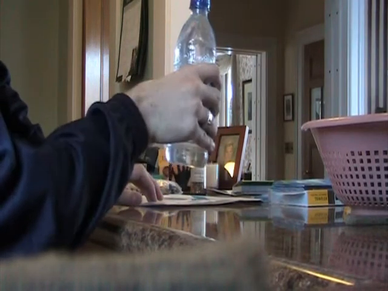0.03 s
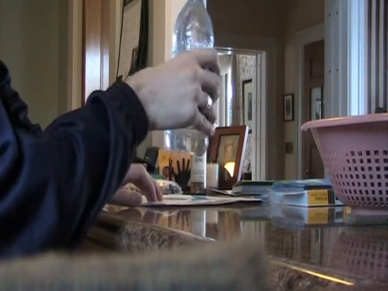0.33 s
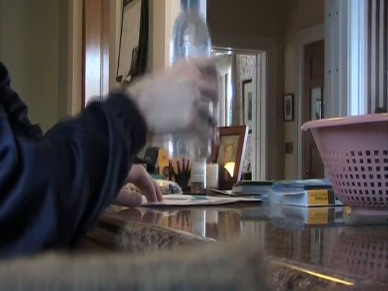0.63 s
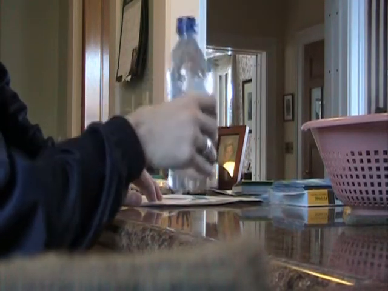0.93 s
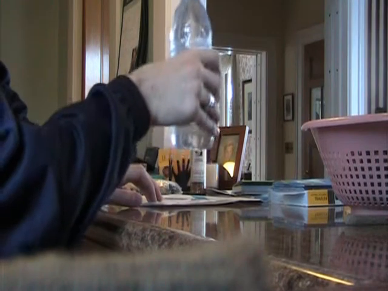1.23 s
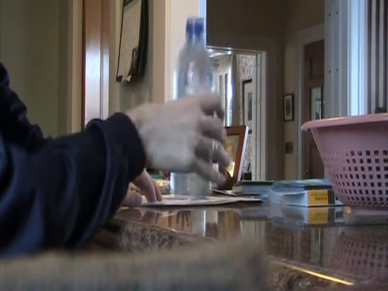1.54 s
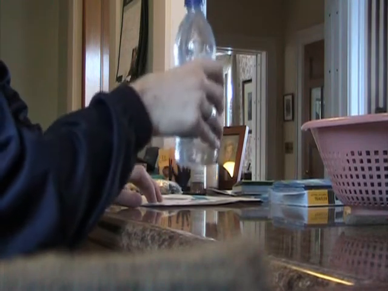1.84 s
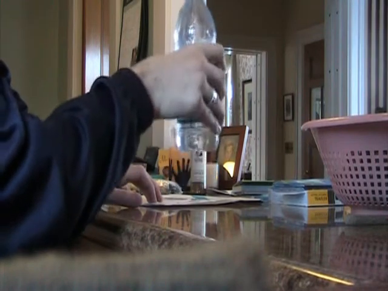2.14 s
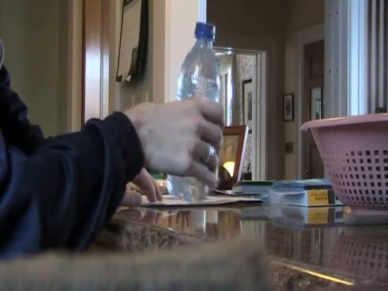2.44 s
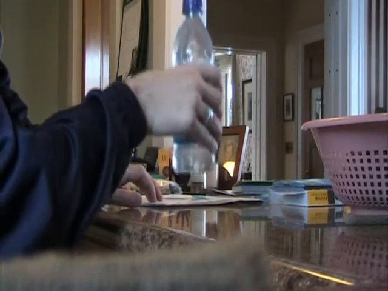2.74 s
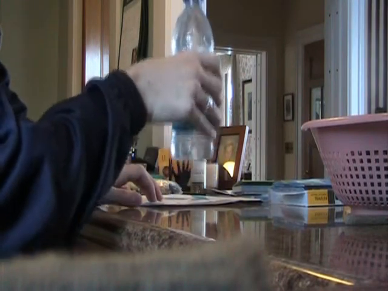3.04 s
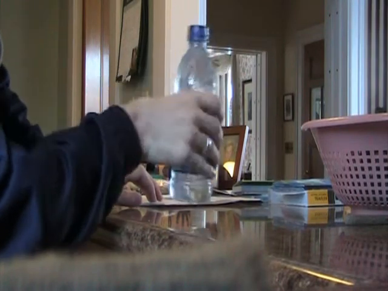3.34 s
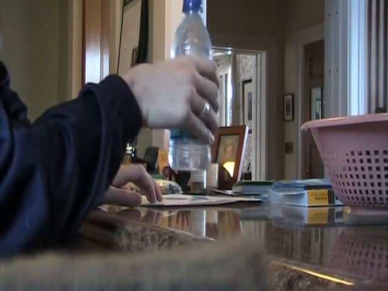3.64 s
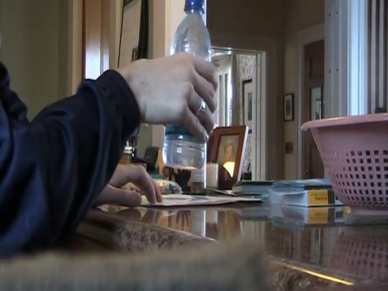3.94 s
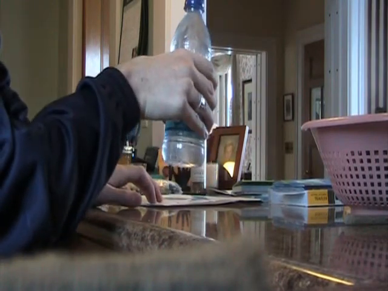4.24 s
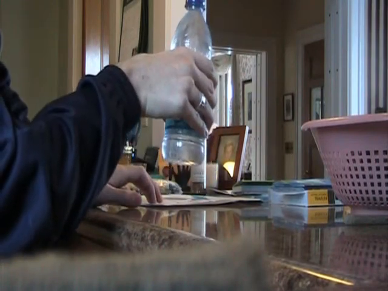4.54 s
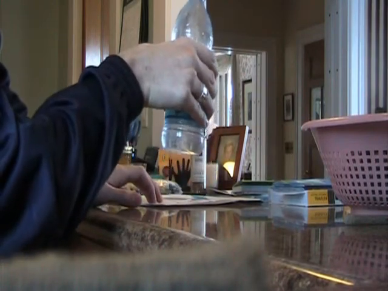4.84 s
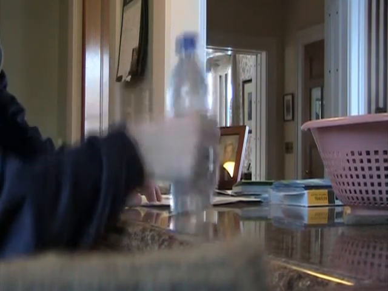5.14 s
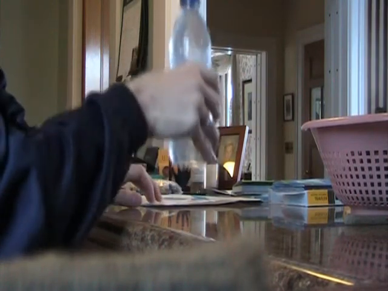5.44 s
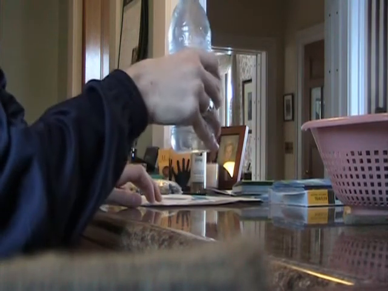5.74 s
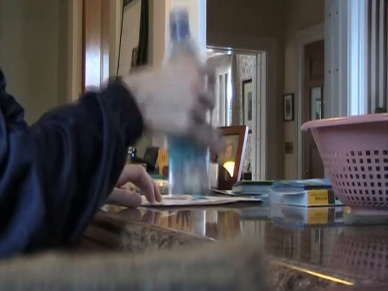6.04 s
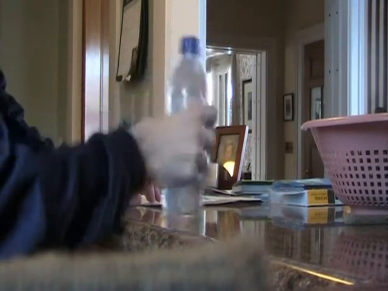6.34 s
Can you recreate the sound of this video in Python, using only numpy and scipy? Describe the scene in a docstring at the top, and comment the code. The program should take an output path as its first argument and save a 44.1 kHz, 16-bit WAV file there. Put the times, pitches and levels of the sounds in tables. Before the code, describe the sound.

A plastic water bottle is pounded on a stone kitchen counter in sharp, crackling thuds over a faint fridge hum.

```python
"""A plastic water bottle is pounded, bottom down, on a stone kitchen counter close to the microphone.
Each blow is a short crackle of the ribbed base and a thud that rings counter and bottle and, when hard,
overloads the input. The last lands on the rim; the base slaps down and something small tinkles.
The kitchen answers with a half-second tail. A fridge hums behind; the bottle creaks in the grip."""
import sys
import numpy as np
from scipy import signal
from scipy.fft import rfft, irfft
from scipy.io import wavfile

SR = 44100
rng = np.random.default_rng(int(sys.argv[2]) if len(sys.argv) > 2 else 0)


def inscribe(sig):
    """Save sig as 16-bit PCM at rate SR to the path in sys.argv[1].

    A 1-D sig is mono; a 2-D sig holds one channel per row.
    Samples are clipped to [-1, 1] before scaling.
    """
    pcm = np.round(np.clip(np.atleast_2d(sig).T, -1, 1) * 32767)
    wavfile.write(sys.argv[1], SR, pcm.astype(np.int16))


N = 285768
LEAD_IN = SR // 4   # samples before time zero


def from_db(db):
    """Decibels to gain."""
    return 10 ** (np.asarray(db) / 20)


def at_hz(points, hz):
    """Reads a table on a log-frequency axis."""
    f, value = np.transpose(points)
    return np.interp(np.log(np.maximum(hz, 1)), np.log(f), value)


def low_pass(x, hz, order=2):
    """Causal Butterworth low-pass."""
    return signal.sosfilt(signal.butter(order, min(hz, .45 * SR), fs=SR, output="sos"), x)


def resonance(x, hz, width_hz):
    """Two-pole resonance, unity peak gain."""
    r = np.exp(-np.pi * width_hz / SR)
    feedback = [1, -2 * r * np.cos(2 * np.pi * hz / SR), r * r]
    return signal.lfilter(np.array([1, 0, -1]) * (1 - r * r) / 2, feedback, x)


def add(track, sound, time_s):
    """Mixes a sound into a track that starts one lead-in before time zero."""
    start = LEAD_IN + round(time_s * SR)
    part = sound[..., :track.shape[-1] - start]
    track[:, start:start + part.shape[-1]] += part


def stereo_noise(spectrum, correlation, size):
    """Noise with a given spectrum and left-right correlation; 0 dB is white noise of rms 1."""
    hz = np.fft.rfftfreq(size, 1 / SR)
    mid, side = rfft(rng.standard_normal((2, size))) * from_db(at_hz(spectrum, hz))
    alike = np.clip(at_hz(correlation, hz), -1, 1)
    return irfft(np.sqrt((1 + alike) / 2) * mid + np.sqrt((1 - alike) / 2) * side * [[1], [-1]], size)


def dying_noise(spectrum, t60s, correlation, size):
    """Response of countless modes: half-octave bands, each with its own gain and decay."""
    t, hz = np.arange(size) / SR, np.fft.rfftfreq(size, 1 / SR)
    white = rfft(stereo_noise([(1, 0), (SR, 0)], correlation, size))
    out = 0
    for centre_hz in 45 * 2 ** np.arange(0, 9, .5):
        octaves = np.log2(np.maximum(hz, 1) / centre_hz)
        window = np.cos(np.pi / 2 * np.clip(2 * octaves, -1, 1)) ** 2
        band = irfft(white * window, size) * from_db(-60 * t / at_hz(t60s, centre_hz))
        norm = np.sqrt(2 * window.mean() / np.sum(band ** 2))
        out = out + band * norm * from_db(at_hz(spectrum, centre_hz))
    return out


# clatter spectrum: (frequency [Hz], relative density [dB])
CLATTER_SPECTRUM = [(60, -31), (150, -25.5), (300, 5), (600, 3), (1200, -4.5), (2400, -8.5), (4500, -24),
                    (8000, -25), (15000, -36)]
# clatter decay: (frequency [Hz], t60 [s])
CLATTER_DECAY = [(100, 0.11), (600, 0.13), (2000, 0.1), (10000, 0.085)]
# direct sound, left against right: (frequency [Hz], correlation [-1..1])
NEAR_CORRELATION = [(100, 0.83), (500, 1), (1000, 0.81), (3000, 0.4), (12000, 0.15)]


def clatter():
    """Dense short ringing of the counter and what lies on it."""
    return dying_noise(CLATTER_SPECTRUM, CLATTER_DECAY, NEAR_CORRELATION, size=SR // 4)


def snaps(t, spread_s, touch_db=-16, level_db=-0.5, side_db=-7):
    """The ribbed base touches down, then buckles in a few milliseconds of dense snaps around t = 0."""
    touch = from_db(touch_db) * np.exp(-.5 * (t / (2 * spread_s)) ** 2)
    buckle = np.exp(-.5 * (t / spread_s) ** 2)
    mid, side = rng.standard_normal((2, len(t)))
    return from_db(level_db) * (touch + buckle) * (mid + from_db(side_db) * side * [[1], [-1]])


# plastic base: (frequency [Hz], width [Hz], gain [dB])
SHELL_MODES = [(1470, 190, -4), (1935, 110, 1), (2400, 920, -2.5), (3110, 2230, -5), (3890, 770, -3),
               (5130, 550, -13.5), (6840, 7400, -16.5), (9180, 840, -11.5), (13600, 6400, -24.5)]


def shell(x, top_hz):
    """Broad resonances of the thin plastic, in alternating polarity."""
    modes = sum((-1) ** k * from_db(db) * resonance(x, hz, width_hz)
                for k, (hz, width_hz, db) in enumerate(SHELL_MODES))
    return low_pass(modes, top_hz)


def pop(t, hz, t60_s=.0075, level_db=2.5):
    """The dome of the base flexes with a short hollow note."""
    return np.sin(2 * np.pi * hz * t) * from_db(level_db - 60 * t / t60_s)


# blows, levels relative:
# (time [s], force [dB], crackle [dB], crackle top [Hz], pop [Hz], pop level [dB], on rim [bool])
BOTTLE_BLOWS = [(-0.15, -1, 1, 12000, 2200, -22, False), (0.8031, 1.5, 6, 12200, 2950, -14, False),
                (1.5835, -0.5, 5.5, 12000, 2390, -2.5, False), (2.3830, 0, 2.5, 18000, 8800, -14, False),
                (3.2331, 0, 0.5, 13000, 1890, -12, False), (5.2212, 0.3, 2.5, 11500, 2990, -7.5, False),
                (6.1605, -10.5, -16.5, 13000, 2220, -7.5, False), (6.4090, 5, 8.5, 15000, 1630, -13, True)]
SLAP_LAG_S = .0255


def contacts(slap_db=-12, slap_crackle_db=-17, slap_pop_hz=2580, slap_pop_db=-9):
    """One contact per blow; after a rim blow the base also slaps down flat."""
    for time_s, force_db, crackle_db, top_hz, pop_hz, pop_db, on_rim in BOTTLE_BLOWS:
        yield time_s, force_db, crackle_db, top_hz, pop_hz, pop_db
        if on_rim:
            yield (time_s + SLAP_LAG_S, force_db + slap_db, crackle_db + slap_crackle_db,
                   top_hz, slap_pop_hz, slap_pop_db)


def knocks(t):
    """Plastic meets stone: a light touch, then crackle, pop and clatter. Returns (direct, room)."""
    touch_db, touch_lead_s = 10.5, .0027
    buckle_s, buckle_octaves_per_db, snaps_lag_s, preroll_s = .0009, -.055, .0003, .01
    clatter_db, fresh_db, clatter_lag_s = 25.5, -5, .0006
    room_crackle_db, room_pop_db, room_clatter_db = 28.0, -3.5, 28.5
    near, room = np.zeros((2, 2, LEAD_IN + N))
    click = signal.unit_impulse(len(t))
    spot = clatter()   # blows land on nearly the same spot, so the clatter mostly repeats
    for time_s, force_db, crackle_db, top_hz, pop_hz, pop_db in contacts():
        slowness = 2 ** (buckle_octaves_per_db * force_db)   # gentler blows buckle more slowly
        fresh = clatter()
        crackle = shell(snaps(t - preroll_s - snaps_lag_s, buckle_s * slowness), top_hz)
        note = from_db(pop_db) * pop(t, pop_hz)
        ringing = spot + from_db(fresh_db) * fresh
        add(near, from_db(touch_db) * fresh, time_s - touch_lead_s * slowness)
        add(near, from_db(crackle_db) * crackle, time_s - preroll_s)
        add(near, note, time_s)
        add(near, from_db(clatter_db + force_db) * ringing, time_s + clatter_lag_s)
        # summed over all directions, crackle and clatter have the smooth spectrum of one click
        bottle = from_db(room_crackle_db + crackle_db) * shell(click, top_hz)
        bottle += from_db(room_pop_db) * note
        counter = from_db(room_clatter_db + force_db) * resonance(click, hz=650, width_hz=1300)
        add(room, kitchen(bottle) + kitchen(counter), time_s)
    return near, room


# counter and filled bottle: (frequency at pitch 1 [Hz], relative level [dB], t60 [s])
THUD_MODES = [(124.6, -1, 0.08), (152.4, -16.5, 0.26), (170.1, -0.5, 0.089), (192.2, -18, 0.29),
              (228, -29, 0.045), (317, -12.5, 0.053), (374.3, -20, 0.13), (448.5, -17.5, 0.11),
              (548.6, -14, 0.071), (610.4, -11.5, 0.06), (781, -12.5, 0.044), (1041, -16, 0.074),
              (1129, -25.5, 0.2), (1436, -17, 0.095)]


def thud(t, contact_hz, pitch, scatter_db=0.85, build_s=0.0023, radiate_hz=110):
    """The water's weight rings the modes; a soft landing sounds only the low ones."""
    hz, level_db, t60_s = np.transpose(THUD_MODES)[:, :, None]
    level_db = level_db + scatter_db * rng.standard_normal(hz.shape)
    modes = from_db(level_db - 60 * t / t60_s) * np.sin(2 * np.pi * pitch * hz * t)
    ringing = modes.sum(0) * (1 - np.exp(-t / build_s))
    radiated = ringing - low_pass(ringing, radiate_hz, order=1)   # the slab radiates little deep bass
    return low_pass(radiated, contact_hz)


def thuds(t):
    """The water lands once the base gives way; a gentler blow is weaker, lower, duller and earlier."""
    level_db, level_db_per_db = -0.2, .4
    pitch, pitch_per_db = .96, 0.0252
    base_contact_hz, contact_octaves_per_db = 2400, 0.43
    lag_s, lag_s_per_db = 0.003948, .0003
    rim_db, rim_water_lag_s = -2, 0.01754
    track = np.zeros((2, LEAD_IN + N))
    for time_s, force_db, *_, on_rim in BOTTLE_BLOWS:
        gain = from_db(level_db + level_db_per_db * force_db)
        contact_hz = base_contact_hz * 2 ** (contact_octaves_per_db * force_db)
        lands_s = time_s + lag_s + lag_s_per_db * force_db
        if on_rim:   # the bottle rings higher and the water lands late
            add(track, gain * from_db(rim_db) * thud(t, contact_hz, pitch=1.55), lands_s)
            add(track, gain * thud(t, contact_hz=272, pitch=0.903), time_s + rim_water_lag_s)
        else:
            add(track, gain * thud(t, contact_hz, pitch + pitch_per_db * force_db), lands_s)
    return track


# reverberation spectrum: (frequency [Hz], gain [dB])
KITCHEN_SPECTRUM = [(50, 4), (110, -18), (190, -11), (400, 0.5), (800, -3.5), (1600, -10), (3500, -14),
                    (7000, -16), (14000, -24.5)]
# reverberation decay: (frequency [Hz], t60 [s])
KITCHEN_DECAY = [(60, 0.57), (160, 0.84), (420, 0.53), (1100, 0.59), (2900, 0.56), (7700, 0.43),
                 (14000, 0.59)]
# diffuse sound, left against right: (frequency [Hz], correlation [-1..1])
KITCHEN_CORRELATION = [(50, 0.96), (200, 0.95), (500, 0.94), (1000, 0.82), (2000, 0.73), (5000, 0.17),
                       (15000, 0)]


def kitchen(x, build_s=0.037):
    """Diffuse stereo tail that builds up; each call takes other paths through the room."""
    tail = dying_noise(KITCHEN_SPECTRUM, KITCHEN_DECAY, KITCHEN_CORRELATION, size=2 ** 15)
    t = np.arange(tail.shape[1]) / SR
    tail *= 1 - np.exp(-(t / build_s) ** 2)
    return signal.fftconvolve(x[None], tail, axes=1)[:, :len(x)]


# modes between the walls: (frequency [Hz], width [Hz], gain [dB])
STANDING_WAVES = [(46, 1.5, -10), (59.75, 2.5, -0.5), (88.2, 4, 2), (105.6, 1.7, -4), (177, 1.8, -16.5)]


def room_boom(x, echo_s=.083, echo_db=-15, echo_top_hz=900):
    """Standing waves of the room, and one dull echo from the far end of the hall."""
    waves = sum(from_db(db) * resonance(x, hz, width_hz) for hz, width_hz, db in STANDING_WAVES)
    echo = np.pad(low_pass(x, echo_top_hz), (round(echo_s * SR), 0))[:len(x)]
    return waves + from_db(echo_db) * echo


# rush of air: (frequency [Hz], relative density [dB])
AIR_SPECTRUM = [(25, -23), (50, -7.5), (80, -23.5), (110, -7), (150, -11.5), (240, -10), (310, -20),
                (370, -8.5), (540, -11), (750, -17), (1100, -16), (2600, -31.5), (7000, -45.5),
                (16000, -53.5)]
# motor tones: (frequency [Hz], relative level [dB])
MOTOR_TONES = [(118.4, -53), (242.2, -57), (436.0, -61), (554.5, -59), (1077, -64)]


def fridge(air_db=-44.5, hum_db=4.0, overtone_db=-1.5, waver=0.15, waver_hz=3.8):
    """Steady rush of air and a slightly wavering motor hum."""
    t = np.arange(N) / SR
    air = stereo_noise(AIR_SPECTRUM, KITCHEN_CORRELATION, N)
    out = from_db(air_db) * air / air.std()
    for k, (hz, db) in enumerate(MOTOR_TONES):
        drift = low_pass(rng.standard_normal((2, N + SR)), waver_hz)[:, SR:]
        swell, phase = waver * drift / drift.std()
        amplitude = np.sqrt(2) * from_db(db + hum_db + overtone_db * (k > 0))
        out += amplitude * (1 + swell) * np.sin(2 * np.pi * hz * t + phase)
    return out


def slip_strength(size, spread_db=6.0, hold_s=0.00032):
    """Envelope of tiny slips, each with a random strength; rms 1."""
    draws = from_db(spread_db * rng.standard_normal(size))
    strength = draws[(np.arange(size) / (hold_s * SR)).astype(int)]
    return strength / np.sqrt(np.mean(strength ** 2))


# creaks in the grip: (time [s], relative level [dB], rise [s])
GRIP_CREAKS = [(0.047, -46.5, .008), (1.845, -47.5, 0.0074), (2.258, -49, .006), (3.179, -51, 0.012),
               (5.14, -49.5, .017), (6.126, -50.5, 0.0079)]


def creaks(centre_hz=6900, width_hz=5000, gain_db=-4.5):
    """Faint ticks and rubs of thin plastic under the fingers."""
    track, t = np.zeros((2, LEAD_IN + N)), np.arange(SR // 5) / SR
    for time_s, db, rise_s in GRIP_CREAKS:
        slips = rng.standard_normal(len(t)) * slip_strength(len(t))
        envelope = t / rise_s * np.exp(1 - t / rise_s)
        rub = resonance(slips, centre_hz, width_hz) * envelope
        add(track, from_db(db + gain_db) * rub, time_s - rise_s / 2)
    return track


# small hard object: (frequency [Hz], level [dB], t60 [s])
TINKLE_MODES = [(4330, -24.5, 0.09), (5620, -32, 0.11), (7850, -34, 0.14)]


def tinkle(t):
    """Something small on the counter rings, shaken by the slap after a rim blow."""
    track = np.zeros((2, LEAD_IN + N))
    ringing = sum(from_db(db - 60 * t / t60_s) * np.sin(2 * np.pi * hz * t)
                  for hz, db, t60_s in TINKLE_MODES)
    for time_s, *_, on_rim in BOTTLE_BLOWS:
        if on_rim:
            add(track, ringing, time_s + SLAP_LAG_S)
    return track


def scene(left_lag_s=.000022, right_db=1.0):
    """Bottle, room and fridge; the bottle is slightly to the right, so the left channel lags."""
    t = np.arange(2 ** 15) / SR
    near, room = knocks(t)
    booms = thuds(t)
    room += kitchen(booms[0]) + room_boom(booms[0])
    near += booms + creaks() + tinkle(t)
    hz = np.fft.rfftfreq(near.shape[1], 1 / SR)
    left = irfft(rfft(near[0]) * np.exp(-2j * np.pi * hz * left_lag_s), near.shape[1])
    direct = np.array([left, from_db(right_db) * near[1]])
    return (direct + room)[:, LEAD_IN:] + fridge()


def record(dry):
    """The input overloads with flat tops; the highest treble is cut."""
    ceiling, cutoff_hz = .52, 15900
    clipped = dry / (1 + (dry / ceiling) ** 8) ** (1 / 8)
    return signal.sosfilt(signal.ellip(10, .2, 80, cutoff_hz, fs=SR, output="sos"), clipped)


dry = scene()
out = record(dry)
inscribe(out)
```